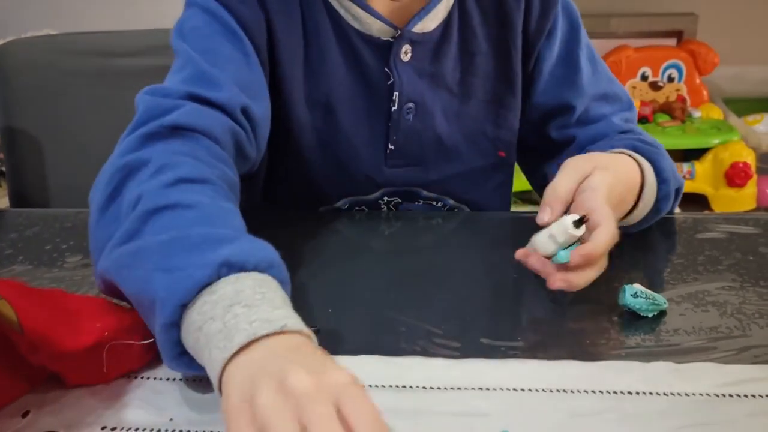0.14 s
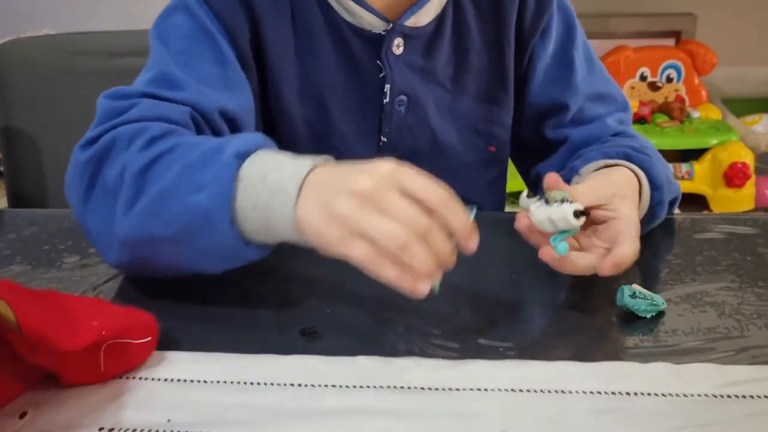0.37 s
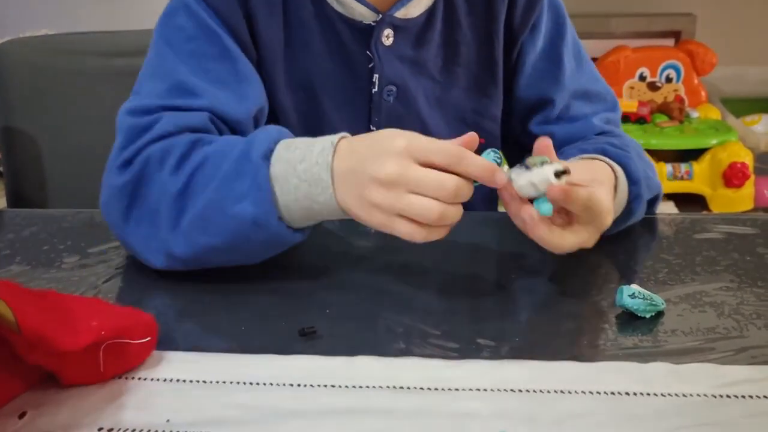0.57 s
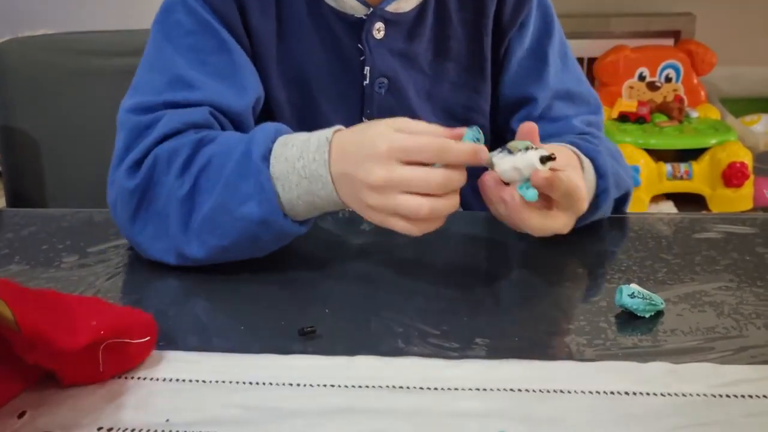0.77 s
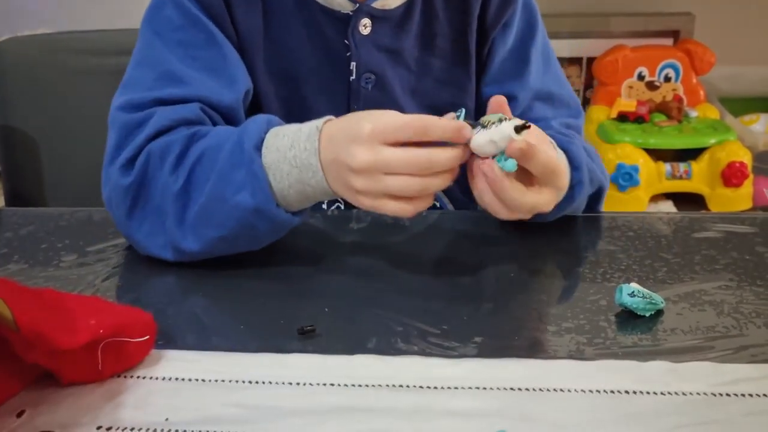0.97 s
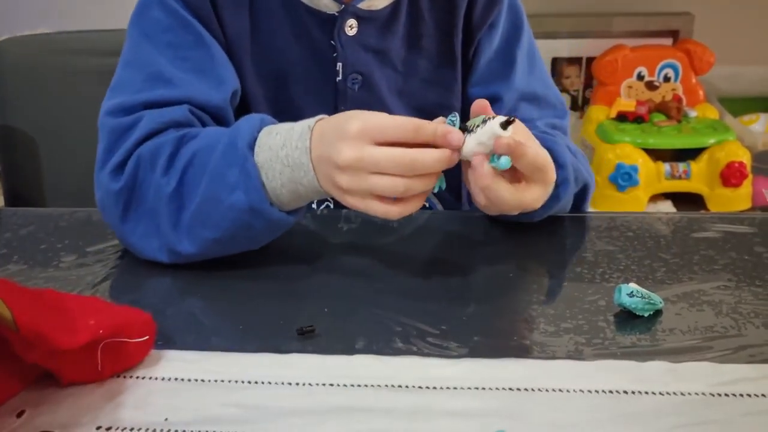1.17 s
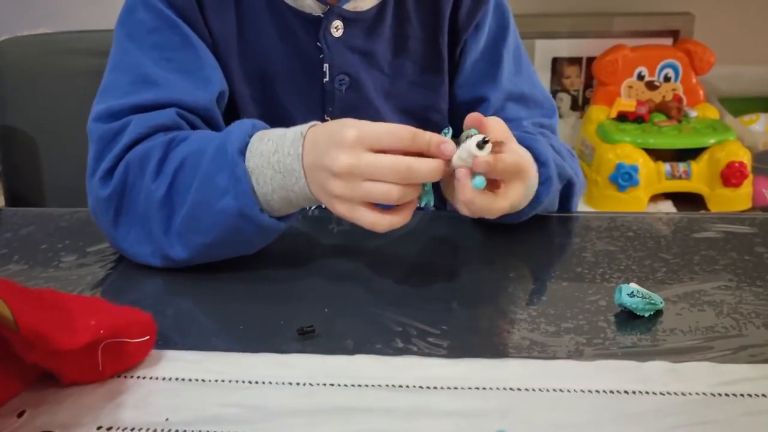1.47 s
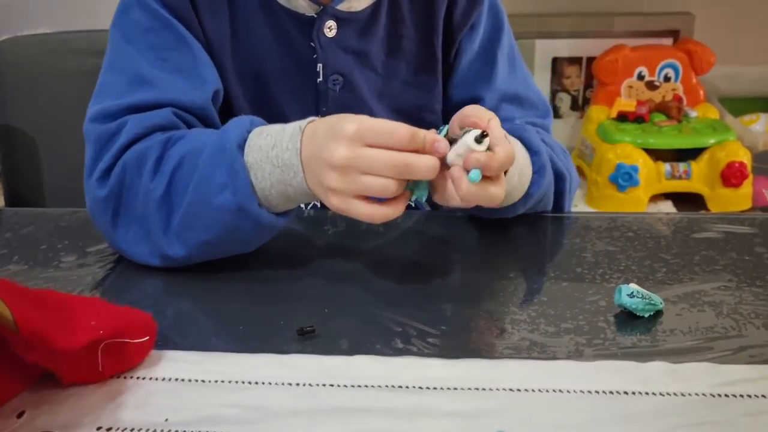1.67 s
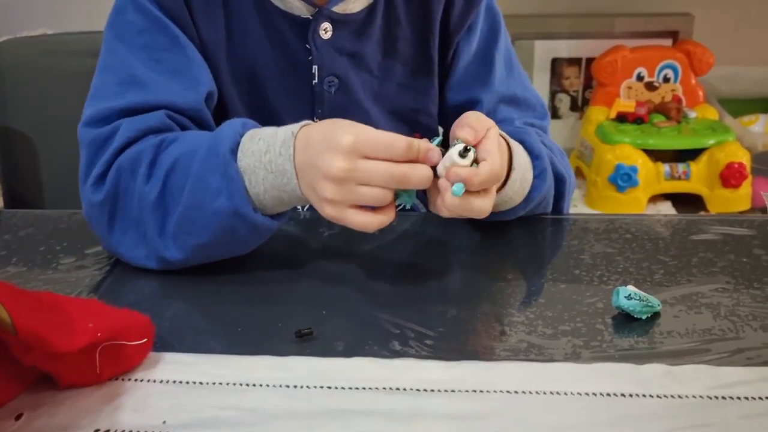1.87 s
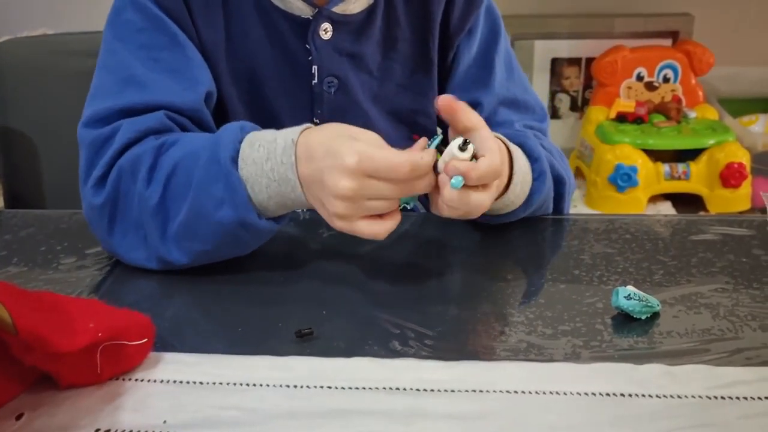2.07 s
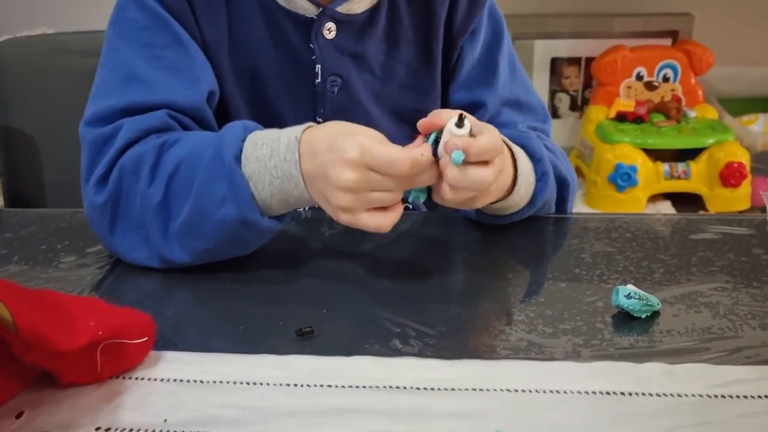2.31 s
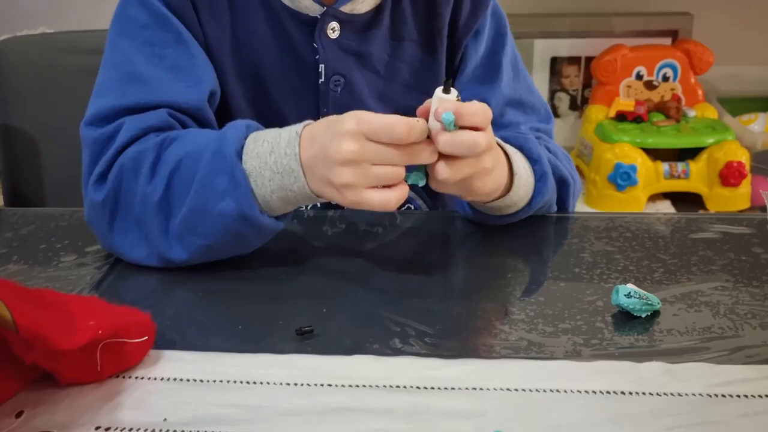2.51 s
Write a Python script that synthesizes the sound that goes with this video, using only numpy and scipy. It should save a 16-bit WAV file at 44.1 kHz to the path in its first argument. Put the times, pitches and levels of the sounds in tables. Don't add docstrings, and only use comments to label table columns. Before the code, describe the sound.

Small plastic toy pieces clatter on a table, tick together, then snap sharply in a quiet room.

```python
import sys
import numpy as np
from scipy import signal
from scipy.fft import rfft, irfft
from scipy.io import wavfile
from scipy.ndimage import uniform_filter1d

SR = 44100
rng = np.random.default_rng(int(sys.argv[2]) if len(sys.argv) > 2 else 0)


def nominal_scale(level):
    x = np.asarray(level, float) / 20
    return 10 ** x


def dump(signal):
    limited = np.clip(np.atleast_2d(signal).T, -1, 1)
    pcm = np.round(limited * 32767).astype(np.int16)
    wavfile.write(sys.argv[1], SR, pcm)


N = 116865

# pitch in Hz, width in Hz, boost in dB.
AIR_HUMPS = [(51.7, 17, 10), (1725, 540, 6), (2920, 340, 5), (4840, 580, 4.5), (10300, 1700, -6.5),
             (13900, 1000, 7.5)]
# pitch in Hz, likeness (1 = the same, 0 = unrelated).
LIKENESS = [(60, .9), (130, .9), (290, .4), (640, -.1), (1410, -.5), (3100, 0.02), (6820, .04),
            (15000, .03)]


def read(points, hz):
    f, value = np.transpose(points)
    return np.interp(np.log(hz + 1), np.log(f + 1), value)


def humps(rows, hz):
    return sum(db / (1 + (2 * (hz - f) / w) ** 2) for f, w, db in rows)


def evened(x):
    return x / np.sqrt(np.mean(x ** 2) + 1e-20)


def curve(points):
    s, db = np.transpose(points)
    return nominal_scale(np.interp(np.arange(N) / SR, s, db))


def pair(z, same, pan_db):
    same = np.clip(same, -1, 1)
    left = z[0] * nominal_scale(pan_db / 2)
    right = (same * z[0] + np.sqrt(1 - same ** 2) * z[1]) * nominal_scale(-pan_db / 2)
    return np.array([left, right])


def hiss(colour_db, same, pan_db, patchy_db, size=1024):
    frames, hz = 4 * N // size + 5, np.fft.rfftfreq(size, 1 / SR)
    a, b, c, d, patches = rng.standard_normal((frames, len(hz), 5)).T
    patches = uniform_filter1d(patches, size=10, axis=0)
    patches = evened(uniform_filter1d(patches, size=10, axis=1))
    z = pair([a + 1j * b, c + 1j * d], same(hz)[:, None], pan_db)
    z = z * nominal_scale(colour_db(hz)[:, None] + patchy_db * patches)
    return evened(signal.istft(z, nperseg=size, noverlap=3 * size // 4)[1][:, :N])


def ringing(body, tilt_db):
    colour, rings = body
    hz = abs(np.fft.fftfreq(4096, 1 / SR))
    tilt = tilt_db * np.log2(np.maximum(hz, 500) / 4000)
    colour_db = read(colour, hz) + humps(rings, hz) + tilt
    log_gain = np.log(nominal_scale(np.maximum(colour_db, -100)))
    ring = np.fft.ifft(np.exp(np.conj(signal.hilbert(log_gain)))).real[:2048]
    return ring / np.linalg.norm(ring)


def levelled(slips, rattle):
    for _ in range(3):
        z = rfft(slips)
        slips = irfft(z / np.sqrt(uniform_filter1d(abs(z) ** 2, size=9) + 1e-12))
        slips = slips * np.exp(-(np.arange(len(slips)) / SR / (1.15 * rattle)) ** 6)
    return slips


def room(x, early_db):
    # pitch in Hz, time in seconds.
    fade_times = [(100, 0.25), (260, 0.54), (700, 0.38), (1840, 0.44), (4850, 0.45), (12800, 0.26)]
    # pitch in Hz, level in dB.
    tail_colour = [(100, 5.5), (700, -2), (3000, -6), (9000, -2), (15000, -2.5)]
    taps = np.zeros((2, SR))
    at = np.arange(280, SR - 16, 16) + rng.integers(0, 16, (2, (SR - 281) // 16))
    np.put_along_axis(taps, at, rng.choice([-1., 1.], at.shape), 1)
    hz, t, z = signal.stft(taps, SR, nperseg=256)
    early = early_db * np.exp(-t[:, None] / 0.016)
    fall_db = read(tail_colour, hz) - 60 * t[:, None] / read(fade_times, hz) + early
    z = pair(z, read(LIKENESS, hz)[:, None], -3) * nominal_scale(fall_db.T)
    tail = signal.istft(z, SR, nperseg=256)[1]
    tail = tail / np.linalg.norm(tail) * np.sqrt(2)
    return signal.fftconvolve(x[None], tail, axes=1)[:, :SR]


def clicks(events, body, wet_db, early_db):
    # delay in seconds, level in dB.
    near_echoes = [(.003, -17), (.0078, -10), (.0145, -12), (.0258, -11)]
    slips_per_s, lag_s = 7500, .0002
    out, t = np.zeros((2, N + SR)), np.arange(4096) / SR
    for s, db, pan_db, rattle, tilt_db in events:
        chance, strength = rng.random(4096), rng.standard_normal(4096)
        ring = ringing(body, tilt_db)
        sway = rng.uniform(0, 0.00052, (len(near_echoes), 2))
        swell = (0.47 + t / rattle) * np.exp(-(t / rattle) ** 4)
        slips = (chance < slips_per_s / SR) * strength * swell
        sound = np.convolve(levelled(slips, rattle), ring)
        sound *= nominal_scale(db) / abs(sound).max()
        for k, side in enumerate([1, -1]):
            arrivals = [(k * lag_s, 1)]
            for (delay, echo_db), w in zip(near_echoes, sway):
                arrivals.append((delay + w[k], side * nominal_scale(echo_db + wet_db)))
            for delay, gain in arrivals:
                at = round((s + delay) * SR)
                out[k, at:at + len(sound)] += gain * nominal_scale(side * pan_db / 2) * sound
        at = round((s + rattle / 2) * SR)
        out[:, at:at + SR] += nominal_scale(wet_db) * np.linalg.norm(sound) * room(ring, early_db)
    return out[:, :N]


def hush():
    # pitch in Hz, level in dB per Hz.
    air_colour = [(25, -6.5), (55, 0), (150, -7), (220, -17.5), (1000, -24), (3000, -20.5), (7000, -28.5),
                  (16000, -29)]
    return nominal_scale(-66) * hiss(lambda hz: read(air_colour, hz) + humps(AIR_HUMPS, hz),
                           lambda hz: 0.5 * read(LIKENESS, hz), -3.5, patchy_db=4.5)


def table_shake():
    # time in seconds, level in dB.
    shaking = [(0, -76.5), (.22, -69), (.68, -80.5), (.75, -58.5), (1.2, -89.5), (1.95, -66), (2.02, -37.5),
               (2.13, -35), (2.27, -40.5), (2.36, -44.5), (2.43, -38), (2.52, -46), (2.61, -49),
               (2.65, -62)]
    # pitch in Hz, level in dB per Hz.
    wobble_colour = [(12, -21), (22, -6), (36, -8), (62, -14.5), (120, -23.5), (250, -37.5), (600, -67)]
    # pitch in Hz, width in Hz, boost in dB.
    leg_humps = [(27.9, 6, 14)]
    return curve(shaking) * nominal_scale(1.5) * hiss(lambda hz: read(wobble_colour, hz) + humps(leg_humps, hz),
                                            lambda hz: 1 + 0 * hz, -4, patchy_db=-2.3, size=8192)


def finger_pinches():
    # start in seconds, peak in dB, left-right in dB, rattle in seconds, brightness in dB per octave.
    pinches = [
        (.0706, -26.5, -11.5, 0.00072, 2),
        (.0718, -28.5, 2, 0.0032, -1),
        (.49, -58.5, 6.5, 0.0229, -21),
        (2.385, -56.5, -1, 0.03, -16),
    ]
    # pitch in Hz, width in Hz, boost in dB.
    finger_body = [(80, -31.5), (200, -7), (800, -6), (1500, -3), (2500, -7.5), (3500, -19.5), (5500, -13),
                   (16000, -39)], [(5600, 4200, 1), (1500, 150, 7.5), (1250, 200, -6.5)]
    return clicks(pinches, finger_body, wet_db=-3.0, early_db=5.5)


def board_ring():
    # time in seconds, level in dB.
    board_blows = [
        (0.071, -50),
        (0.211, -26.5),
    ]
    # pitch in Hz, level in dB, time in seconds to fall by 60 dB.
    board_notes = [(263.7, -11.5, 0.91), (434.4, -3.5, 0.42), (725, -4, 0.97), (783, -4.5, 0.85),
                   (848, -2.5, 0.65), (917, -5.5, .22), (1102, 1, 0.52)]
    out = np.zeros((2, N))
    for s, hit_db in board_blows:
        t = np.maximum(np.arange(N) / SR - s, 0)
        choke = np.exp(-(t / .3) ** 4)
        for hz, db, t60 in board_notes:
            turn = rng.uniform(0, 2 * np.pi) + np.array([[0], [np.arccos(read(LIKENESS, hz))]])
            beat = np.cos(2 * np.pi * rng.uniform(7, 20) * t + rng.uniform(0, np.pi, (2, 1)))
            loudness = np.minimum(t / 0.015, 1) * (0.15 + beat) * nominal_scale(hit_db + db - 60 * t / t60)
            out += loudness * choke * np.sin(2 * np.pi * hz * t + turn)
    return out * nominal_scale([[-1.5], [1.5]])


def table_clatter():
    # start in seconds, peak in dB, left-right in dB, rattle in seconds, brightness in dB per octave.
    knocks = [
        (.19, -41.5, -4.5, 0.0072, 3),
        (.2, -29.5, -6, 0.0088, 3.5),
        (.2076, -16, -7, 0.0027, -1.5),
        (.2101, -9.5, -3.5, 0.0014, 3.5),
        (.2115, -2, -16.5, 0.0035, 1.5),
        (.2153, -3, -8, .0024, -0.5),
        (.2176, -4, -8.5, 0.0025, -1.5),
    ]
    # pitch in Hz, width in Hz, boost in dB.
    table_body = [(60, -32), (140, -22), (600, -12), (900, -4.5), (1350, -9), (2500, -10), (8600, -13),
                  (16000, -21)], [ (435, 60, 4.5), (1900, 300, 3.5), (2450, 400, 7), (2943, 500, 9),
                  (3540, 260, 6), (5210, 500, 4), (6830, 300, 5.5), (7900, 400, 4.5), (11500, 3000, -6.5)]
    return clicks(knocks, table_body, wet_db=1.0, early_db=1.0)


def thumps():
    # start in seconds, peak in dB, pitch in Hz, time in seconds to fall by 60 dB.
    blows = [
        (0.214, -39.5, 146, 0.62),
        (0.213, -38, 86, 0.39),
        (0.684, -41, 60.3, 0.3),
        (1.435, -70.5, 364, 0.24),
        (1.85, -70, 510, 0.11),
        (2.401, -32.5, 80.3, 0.19),
    ]
    out = np.zeros((2, N))
    for s, db, hz, t60 in blows:
        t = np.maximum(np.arange(N) / SR - s, 0)
        sag = 20 * 0.044 * (1 - np.exp(-t / 0.091))
        loudness = np.minimum(t / .015, 1) * nominal_scale(db - 60 * t / t60)
        out = out + loudness * np.sin(2 * np.pi * (hz * t + sag)) * nominal_scale([[-1.2], [1.2]])
    return out


def first_meeting():
    # start in seconds, peak in dB, left-right in dB, rattle in seconds, brightness in dB per octave.
    meetings = [
        (.911, -56, -1.5, 0.0067, -1),
        (.9208, -33, -4, 0.0011, 1),
        (.9223, -30.5, -7.5, 0.002, 2),
    ]
    # pitch in Hz, width in Hz, boost in dB.
    shell_body = [(500, -33), (1400, -34), (2500, -18.5), (3200, -6.5), (5000, -18), (6300, -18),
                  (9500, -24.5), (16000, -29)], [ (818, 73, 25), (2190, 94, 23), (2922, 284, 11.3),
                  (3580, 160, 7.8), (4470, 210, 8.1), (5240, 200, 9.1), (6790, 190, 11), (7520, 400, 16),
                  (8560, 490, 8.8)]
    return clicks(meetings, shell_body, wet_db=-4.0, early_db=9.5)


def loose_touches():
    # start in seconds, peak in dB, left-right in dB, rattle in seconds, brightness in dB per octave.
    touches = [
        (1.078, -54, -5, .03, 7),
        (1.1631, -53, -8, 0.0035, 3.5),
        (1.2828, -32.5, -12.5, 0.0013, 0),
        (1.2862, -24.5, -4, 0.00084, 1),
        (1.52, -54.5, -8.5, 0.042, 14),
        (1.6, -54.5, -9, 0.073, 10.5),
    ]
    # pitch in Hz, width in Hz, boost in dB.
    loose_body = [(500, -48), (1400, -29), (2400, -15.5), (3000, -9), (5000, -15.5), (6300, -15),
                  (9500, -30), (16000, -32.5)], [ (2170, 99, 6.9), (2780, 130, 10.4), (3238, 140, 10),
                  (3540, 140, 11.7), (4230, 106.5, 4.3), (4810, 210, 7), (5340, 97, 12.6), (7250, 240, 6.7),
                  (7940, 770, 7.5)]
    return clicks(touches, loose_body, wet_db=-3.5, early_db=12.0)


def peg_ticks():
    # start in seconds, peak in dB, left-right in dB, rattle in seconds, brightness in dB per octave.
    ticks = [
        (1.5875, -48, -7.5, 0.0019, -17),
        (1.7962, -43.5, -8, 0.0042, -19.5),
        (2.1625, -28, -14.5, 0.00195, -1.9),
        (2.3448, -35.5, -8.5, 0.0024, -2.5),
    ]
    # pitch in Hz, width in Hz, boost in dB.
    peg_body = [(1000, -115), (3200, -34), (3900, -17), (6500, -22), (9000, -24), (12000, -26),
                (14500, -20), (16000, -28)], [ (4260, 550, 16), (5700, 450, 12), (7650, 550, 15),
                (10400, 700, 14), (14000, 900, 10)]
    return clicks(ticks, peg_body, wet_db=-5.0, early_db=10.0)


def sleeve():
    # time in seconds, rustle in dB.
    pressure = [(1.6, -85.5), (1.7, -80.5), (1.745, -70.5), (1.9, -86.5), (1.935, -59.5), (2.03, -49.5),
                (2.17, -60), (2.3, -78.5), (2.35, -77)]
    # pitch in Hz, level in dB per Hz.
    cloth_colour = [(88, -35), (150, 0.5), (278, -16), (601, -10.5), (1910, -1.5), (6180, -22.5),
                    (8100, -22), (10200, -44), (15000, -36.5)]
    return curve(pressure) * nominal_scale(4.5) * hiss(lambda hz: read(cloth_colour, hz) + humps(AIR_HUMPS, hz),
                                             lambda hz: read(LIKENESS, hz), -3.5, patchy_db=-1.5, size=512)


def peg_snaps():
    # start in seconds, peak in dB, left-right in dB, rattle in seconds, brightness in dB per octave.
    snaps = [
        (2.4018, -24, -3, 0.0019, 18.5),
        (2.4038, -27, -4.5, .0018, 4),
        (2.419, -32.5, 2, .005, -6),
        (2.4232, -22.5, 2.5, 0.0033, -5.5),
        (2.4274, -6.5, -6, 0.001, 0),
        (2.4286, -9.5, -6.5, 0.001, -1),
        (2.626, -43, -11, .003, -1),
    ]
    # pitch in Hz, width in Hz, boost in dB.
    socket_body = [(250, -42), (900, -22.5), (1700, -16), (2800, -1.5), (4200, 0), (7000, -10),
                   (12000, -18), (16000, -23)], [ (663, 162, 12.5), (2200, 310, 6), (3290, 340, -12),
                   (3790, 550, 6), (5230, 470, 1), (6900, 700, 7), (15100, 1700, 4.5), (10000, 3200, -3)]
    return clicks(snaps, socket_body, wet_db=-3.0, early_db=7.0)


def scene():
    toy = finger_pinches() + table_clatter() + first_meeting()
    toy = toy + loose_touches() + peg_ticks() + peg_snaps()
    table = table_shake() + thumps() + board_ring()
    return toy + sleeve() + table + hush()


def top_cut(x):
    return signal.sosfilt(signal.butter(12, 16820, fs=SR, output="sos"), x)


def record(dry):
    ceiling, mic_edge_hz = .87, 15700
    held = dry / (1 + (dry / ceiling) ** 6) ** (1 / 6)
    edge = signal.cheby2(8, 30, mic_edge_hz + 600, fs=SR, output="sos")
    held = signal.sosfilt(edge, held)
    return top_cut(held)


dry = scene()
out = record(dry)
dump(out)
```